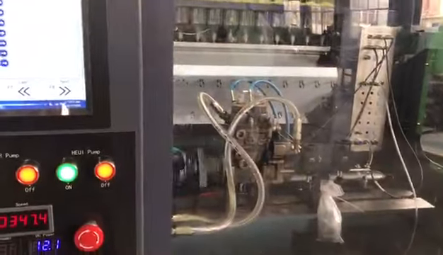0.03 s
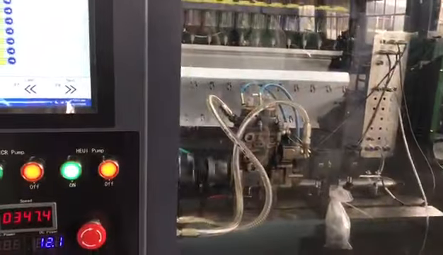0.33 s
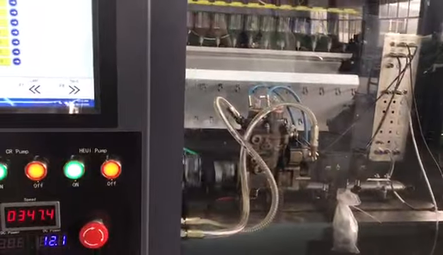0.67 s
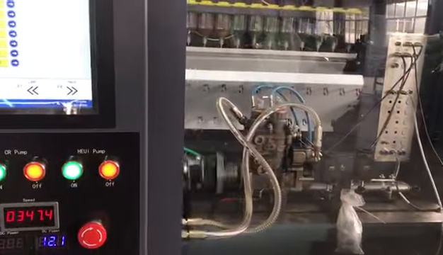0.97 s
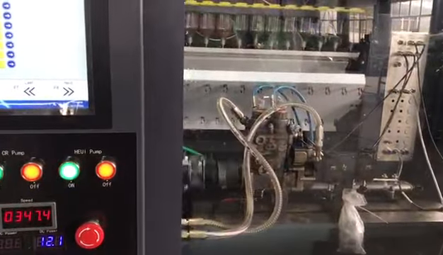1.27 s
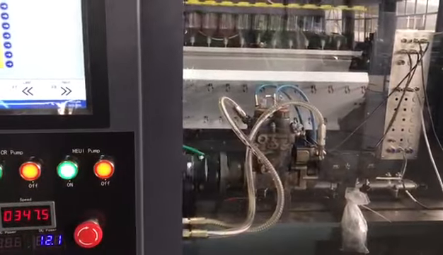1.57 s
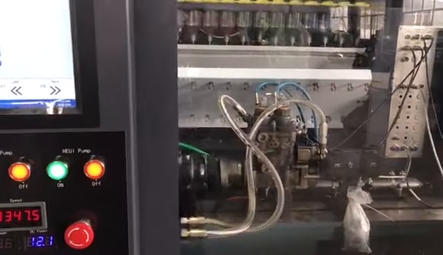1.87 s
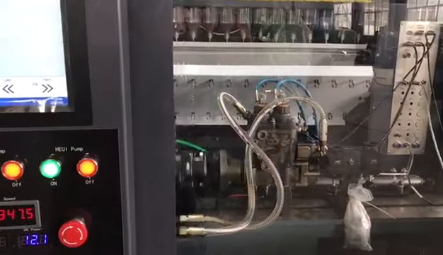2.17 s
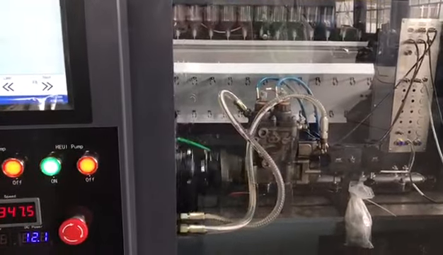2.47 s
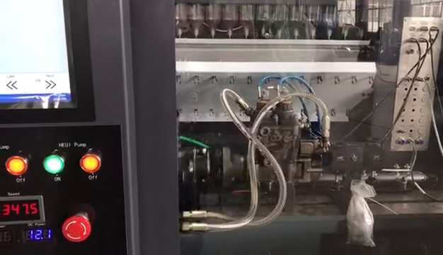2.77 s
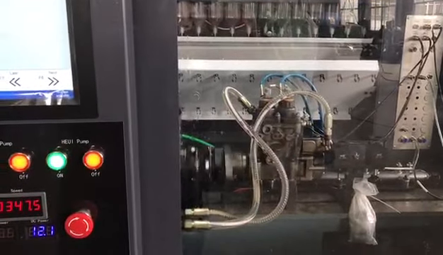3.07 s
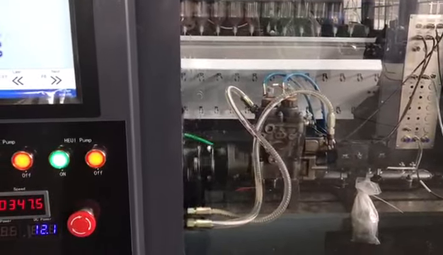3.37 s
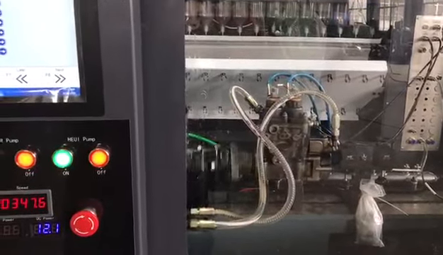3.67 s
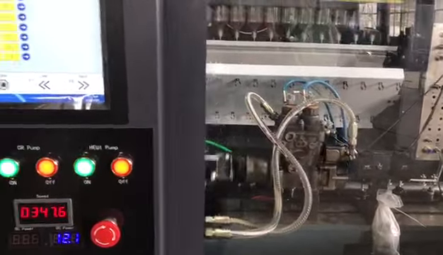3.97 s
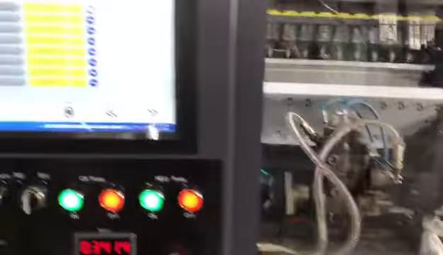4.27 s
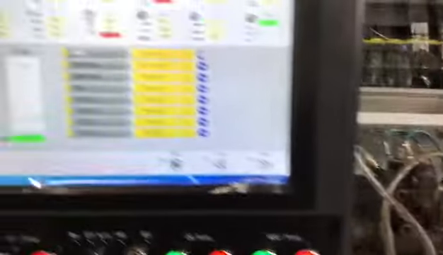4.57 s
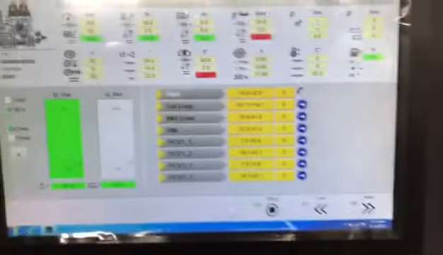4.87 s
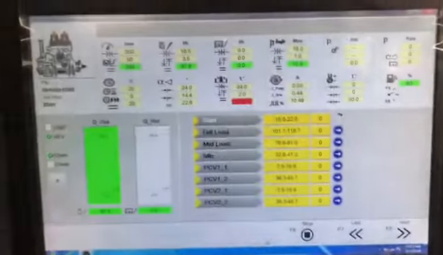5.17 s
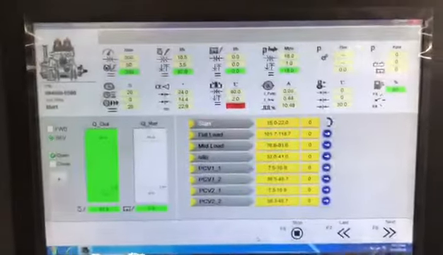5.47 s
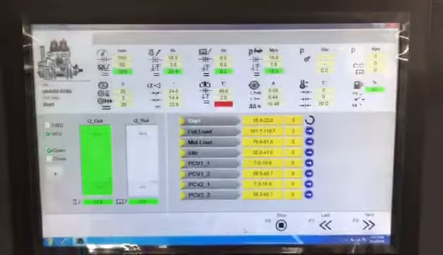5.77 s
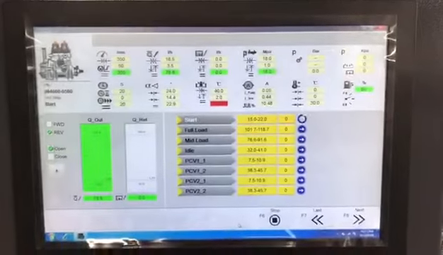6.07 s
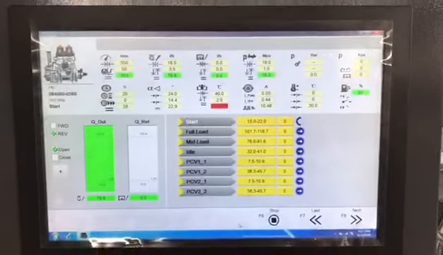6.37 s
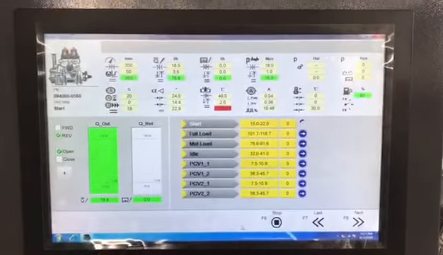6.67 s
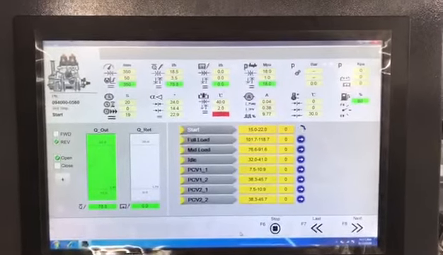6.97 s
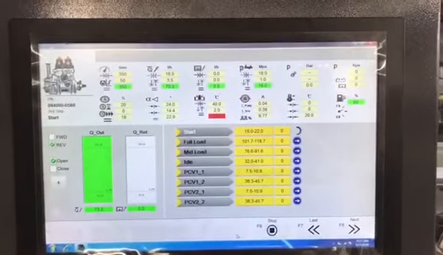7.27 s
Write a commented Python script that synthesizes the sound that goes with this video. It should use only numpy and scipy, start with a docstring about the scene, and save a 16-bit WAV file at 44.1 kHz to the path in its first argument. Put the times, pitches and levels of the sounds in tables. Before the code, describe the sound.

A piercing valve whine grows louder over the drone, gear noise and pulsing hiss of a fuel pump running in a workshop.

```python
"""A shrill valve whine over the drone of a high pressure fuel pump on a workshop test bench.
Pressure ripple shakes the valve's pitch and the room smears it into a band, much louder after 2 s.
The valve also squeals and spits. Plungers ring the housing, fuel hisses in pulses, and gears, fan,
motor and supply pump run at steady speed. From 3.4 s the listener turns to a booming control cabinet."""
import sys
import numpy as np
from scipy import signal
from scipy.fft import rfft, irfft, next_fast_len
from scipy.io import wavfile
from scipy.ndimage import uniform_filter1d

SR = 44100
rng = np.random.default_rng(int(sys.argv[2]) if len(sys.argv) > 2 else 0)


def output_pcm(signal):
    """Save a mono or channel-first signal as 16-bit PCM at the path in sys.argv[1].

    Samples are clipped to [-1, 1] before scaling.
    """
    pcm = np.clip(np.atleast_2d(signal).T, -1, 1) * 32767
    wavfile.write(sys.argv[1], SR, np.round(pcm).astype(np.int16))


N = 322371
TIME_S = np.arange(N) / SR

# main valve mode: (time [s], pitch [Hz], level [dB], swing scale [Hz])
WHINE = [(0.0, 5380, -34.5, 116), (0.5, 5400, -34, 117.6), (0.68, 5367, -32.5, 100),
         (0.88, 5320, -33, 84.9), (1.2, 5354, -35, 110.7), (1.5, 5300, -42, 104), (1.62, 5300, -40, 110),
         (1.99, 5240, -44.5, 115), (2.04, 5290, -37, 90.34), (2.11, 5290, -35.5, 90),
         (2.16, 5380, -29.5, 144), (2.27, 5400, -27, 145), (3.1, 5440, -26, 150.1),
         (3.34, 5430, -29.5, 153.7), (3.52, 5446, -25, 145), (4.25, 5453, -26, 159.2),
         (5.1, 5466, -26.5, 163.6), (6.0, 5498, -28, 163.5), (6.45, 5545, -30, 175),
         (7.05, 5535, -32, 169.2), (7.3, 5555, -33, 169)]
# brief dips and peaks in the whine's random flutter: (peak time [s], dip before it [s], depth [dB])
WHINE_FLICKER = [(3.057, 0.019, 4.5), (3.392, 0.033, 10), (3.622, 0.035, 6), (3.735, .018, 3)]
# other valve modes: (start [s], length [s], pitch [Hz], level [dB], fade [dB], swing [Hz])
SQUEALS = [(1.328, 0.7, 5470, -44, 2, 22.2), (1.71, 0.25, 5050, -36.5, 14, 44.7),
           (2.382, 0.54, 10440, -52, 3, 81), (2.66, 0.3, 5000, -43, 3, 30),
           (3.455, 2.6, 5313, -34.5, -2, 36.23), (2.303, 3.84, 5503, -36, 3, 40.4),
           (4.31, 3.76, 5850, -44, -3, 35.01), (5.67, 0.38, 10850, -47, 6, 130.2),
           (6.085, 0.15, 6020, -27.5, 13, 55), (6.246, 0.73, 6060, -40, 14, 41.7),
           (6.104, 1.2, 5700, -37.5, -0.5, 29.7), (6.606, 0.51, 10760, -39.5, 17, 131),
           (6.62, 0.57, 5380, -28.5, 4, 55.6)]
# short bright ticks: (time [s], level [dB])
# those at 3.057 s and 3.736 s lie on random peaks of the whine; the rest are valve spits
TICKS = [(.487, -30), (3.057, -30), (3.62, -30), (3.736, -29), (5.344, -27), (5.352, -33), (5.448, -29),
         (5.932, -31), (6.287, -33), (6.353, -32)]
# fuel sprays as the valve opens or a mode catches: (start [s], rise [s], decay [s], boost scale [dB])
SPRAYS = [(2.18, 0.044, 1.5, 6), (6.09, .02, 0.048, 9), (6.33, 0.02, 0.1, 5)]
# housing tone: (time [s], pitch [Hz], level [dB])
HOUSING_TONE = [(0, 1834, -41.5), (1.2, 1838, -41), (2.5, 1826, -42.5), (5.0, 1829, -44), (5.7, 1840, -41),
                (7.3, 1856, -41.5)]
# resonances: (centre [Hz], width [Hz], relative gain [dB])
HOUSING_MODES = [(1814, 140, 0), (3160, 86, -22)]
FITTING_MODES = [(3106, 45, -4), (3194, 105, 2)]
PIPE_MODES = [(11040, 200, -1.5), (11170, 210, 1), (11500, 200, -15)]
CABINET_MODES = [(178.3, 17.1, 7.5), (272, 13, 0), (369, 14, 0.5), (818, 25, 7.5)]
# noise spectra: (frequency [Hz], relative density [dB])
TICK_SPECTRUM = [(2500, -31), (4800, -6), (5600, 9), (6500, -3.5), (8000, -12), (11300, -7), (12400, -29)]
HISS_SPECTRUM = [(1500, -35), (3500, 8), (5000, 5), (6100, 12.5), (6700, 8.5), (7600, 4), (8600, 5),
                 (9400, 3), (10200, 1), (11800, -13), (12400, -40)]
GEAR_SPECTRUM = [(250, -33), (470, -16.5), (530, -12), (670, -3.5), (790, -5.5), (1000, -0.5), (1350, 0.5),
                 (1600, -0.5), (2050, -1.5), (2300, -2), (2750, -10), (4000, -40)]
METAL_SPECTRUM = [(1500, -26), (2500, -6), (3300, 2), (3800, 2.5), (4700, 0.5), (6000, -8), (7500, -69),
                  (12000, -16.5)]
FRAME_SPECTRUM = [(20, -22), (33, -14), (50, -8), (90, -7.5), (130, -0.5), (175, -3.5), (240, -1),
                  (350, -4), (430, -10.5), (700, -22), (1500, -70)]
FAN_SPECTRUM = [(300, -23), (420, -8.5), (540, -2), (690, 1.5), (800, -10.5), (1200, -30)]
RUB_SPECTRUM = [(20, -22), (45, -9), (75, -4), (120, -7), (300, -40)]
# noise envelopes: (time [s], level [dB])
GEAR_LEVEL = [(0, -36.5), (2.1, -35), (2.5, -36.6), (3.5, -37), (4.4, -37.5), (5.3, -38.5), (7.3, -38)]
FRAME_LEVEL = [(0, -49.5), (2.1, -45.5), (2.5, -50.5), (3.7, -49), (4.4, -48.5), (6.0, -47), (7.3, -47.5)]
CABINET_LEVEL = [(0, -64), (3.4, -63), (4.2, -47.5), (5.2, -47.5), (6.0, -50), (7.3, -54.5)]
# hum of bench motor, supply pump, drive and pump body: (pitch [Hz], level [dB])
MOTOR_TONES = [(247, -66), (296, -61), (543, -64.5), (819, -61), (891, -57)]
SUPPLY_TONES = [(65.1, -60), (130.1, -64), (195.2, -57.5), (325.3, -61.5)]
DRIVE_TONES = [(43.2, -72), (189.1, -63.5), (224.1, -63.5), (275.2, -65), (347.8, -62.5), (1772, -51),
               (1928, -56), (1966, -59)]
# hum tones that form standing waves: (pitch [Hz])
STANDING_HZ = [139, 172.3, 260.3, 445.6, 493.9, 987.3, 1234.6, 1338]
# their levels, row for row: (initial level [dB], change as the listener moves [dB], change time [s])
STANDING_LEVELS = [(-53.5, -6.5, 2.16), (-56, 3, 3.67), (-55.5, 3.5, 4.77), (-56, -10, 2.4),
                   (-62.5, 3, 1.6), (-52, -3.5, 1.64), (-46.5, -5, 1.7), (-56.5, 2.5, 3.3)]
# hand rubs: (centre time [s], half length [s], peak level [dB])
RUBS = [(1.9, 0.5, -58), (4.446, 0.37, -50.5), (6.1, .4, -56)]
# workshop reverberation: (frequency [Hz], T60 [s])
WORKSHOP_T60 = [(200, 0.15), (5000, 0.38), (12000, 0.13)]

PUMP_HZ, FIRST_STROKE_S, GEAR_BEAT_HZ = 5.79, 0.022, 12.35
PULSE_DB_PER_LOAD = 1.2
USUAL_WHINE_DB = -30
TURN_START_S, TURN_LENGTH_S = 3.4, 1.0
BAND_LIMIT_HZ = 12300


def valve_whine(wander_hz=11.97, shake_hz=39.4, chatter_db=0.46):
    """The valve sings in the fuel flow and chatters on its seat; pressure ripple shakes its pitch."""
    pitch_hz, level_db, swing_hz = curves(WHINE)
    ripple = unit(np.tanh(wobble(220)))  # the seat limits the swing
    spikes = np.clip(wobble(260), 0, 1.7) ** 2  # pressure spikes fling the pitch up
    pressure = 0.8 * ripple + 0.273 * (spikes - spikes.mean())
    hz = pitch_hz + wander_hz * wobble(14) + swing_hz * pressure + shake_hz * wobble(900)
    upper_mode = amp(-25) * tone(2 * hz + 160 + 90 * wobble(500))
    whine = room(tone(hz) + upper_mode, direct_db=-10)
    whine *= amp(chatter_db * wobble(230))
    return amp(level_db + flicker_db() + 0.76 * wobble(13)) * steadied(whine)


def flicker_db(peak_decay_s=0.015):
    """Brief dips and peaks in the whine's random flutter."""
    out = np.zeros(N)
    for peak_s, dip_s, depth_db in WHINE_FLICKER:
        knots_s = peak_s + np.array([-dip_s, -dip_s / 2, -0.001, 0.001, peak_decay_s])
        out += depth_db * np.interp(TIME_S, knots_s, [0, -1, -1, 1, 0])
    return out


def valve_squeals(edge_s=0.0066):
    """Other valve modes catch abruptly, fade or swell, and drop out."""
    out = np.zeros(N)
    for start_s, length_s, hz, db, fade_db, swing_hz in SQUEALS:
        age_s = TIME_S - start_s
        progress = np.clip(age_s / length_s, 0, 1)
        gate = np.clip(np.minimum(age_s, length_s - age_s) / edge_s, 0, 1)
        out += gate * amp(db - fade_db * progress) * tone(hz + swing_hz * wobble(200))
    return room(out, direct_db=-4)


def ticks(faint_per_s=40, decay_s=0.0033):
    """Sharp and faint spits of the valve on its seat, plus bright ticks on two random whine peaks."""
    position, softness = rng.random((int(faint_per_s * N / SR), 2)).T
    onsets = (position * N).astype(int)
    faint_db = -37 + 0.41 * flow_db()[onsets] - 4 * softness
    faint = np.bincount(onsets, amp(faint_db), N)
    sharp_s, sharp_db = np.transpose(TICKS)
    sharp = np.bincount((sharp_s * SR).astype(int), amp(sharp_db), N)
    envelope = signal.lfilter([1], [1, -np.exp(-1 / (decay_s * SR))], faint + sharp)
    return room(envelope * noise(TICK_SPECTRUM), direct_db=-5, positions=4)


def gears():
    """Gear noise under a sawtooth load: sudden rise, steady release."""
    load = -signal.sawtooth(2 * np.pi * GEAR_BEAT_HZ * TIME_S)
    return amp(curves(GEAR_LEVEL)[0] + 0.5 * load + wobble(150)) * noise(GEAR_SPECTRUM)


def plunger_rattle():
    """One rattle from the plungers rings both housing and fittings."""
    rattle = amp(0.4 * pump_load() + 2.6 * wobble(30)) * rng.standard_normal(N)
    housing = amp(-38.5 - 0.5 * turned()) * ring(rattle, HOUSING_MODES)
    fittings = amp(-52.5 - 2 * turned()) * ring(rattle, FITTING_MODES)
    return housing + fittings


def housing_tone(waver_hz=10.05, shake_hz=12.5):
    """The pump housing rings on one wavering pitch."""
    pitch_hz, level_db = curves(HOUSING_TONE)
    hz = pitch_hz + waver_hz * wobble(13) + shake_hz * wobble(90)
    return amp(level_db + 1.15 * wobble(12)) * steadied(room(tone(hz), direct_db=2.5, positions=6))


def metal_rustle():
    """Rubbing metal rustles with the pump load."""
    level_db = -41.5 - 3 * turned() + 0.29 * pump_load() + 1.4 * wobble(120)
    return amp(level_db) * noise(METAL_SPECTRUM)


def fuel_hiss():
    """The fuel jet follows the flow, pulses with the load and flares at each spray."""
    level_db = -47 - 3 * turned() + 0.14 * flow_db() + PULSE_DB_PER_LOAD * pump_load()
    for start_s, rise_s, decay_s, boost_db in SPRAYS:
        age_s = np.maximum(TIME_S - start_s, 0)
        level_db += boost_db * np.minimum(age_s / rise_s, 1) * np.exp(-age_s / decay_s)
    flutter_db = 1.3 * wobble(32) + 1.2 * wobble(300)
    return amp(level_db + flutter_db) * noise(HISS_SPECTRUM)


def drone(sway_s=0.18):
    """Rotating parts hum; the strongest tones shift in level as the listener crosses standing waves."""
    out = np.zeros(N)
    for machine in (MOTOR_TONES, SUPPLY_TONES, DRIVE_TONES):
        speed = 1 + 0.001125 * wobble(3)
        for hz, db in machine:
            out += amp(db + 2.5 * wobble(3.7)) * tone(hz * speed)
    speed = 1 + 0.00058 * wobble(3.03)
    for hz, (db, change_db, change_s) in zip(STANDING_HZ, STANDING_LEVELS):
        moved = (1 + np.tanh((TIME_S - change_s) / sway_s)) / 2
        out += amp(db + change_db * moved + 1.44 * wobble(6)) * tone(hz * speed)
    return out


def frame_rumble():
    """The bench frame rumbles unevenly."""
    return amp(curves(FRAME_LEVEL)[0] + 1.7 * wobble(9.7)) * noise(FRAME_SPECTRUM)


def cabinet_boom():
    """Shaken cabinet panels boom, louder with the listener close."""
    return amp(curves(CABINET_LEVEL)[0]) * ring(rng.standard_normal(N), CABINET_MODES)


def fan():
    """Fan rush, weaker as the listener turns away."""
    return amp(-50.5 - 7.5 * turned() + 0.8 * wobble(12)) * noise(FAN_SPECTRUM)


def pipes():
    """Pulsing flow keeps the steel fuel lines ringing faintly."""
    level_db = -57 + 0.3 * flow_db() + PULSE_DB_PER_LOAD * pump_load() + wobble(14)
    return amp(level_db) * ring(rng.standard_normal(N), PIPE_MODES)


def hand_rubs():
    """Low rubs of a hand as the listener sways and turns."""
    envelope = sum(amp(db) * np.exp(-((TIME_S - at_s) / half_s) ** 2) for at_s, half_s, db in RUBS)
    return envelope * amp(2.8 * wobble(7.5)) * noise(RUB_SPECTRUM)


def pump_load():
    """Load from shaft and plunger strokes: 1, 3 and 12 pulses per turn."""
    shaft_rad = 2 * np.pi * PUMP_HZ * (TIME_S - FIRST_STROKE_S)
    return np.cos(shaft_rad) + np.cos(3 * shaft_rad) + 0.39 * np.cos(12 * shaft_rad)


def flow_db():
    """Whine level above its usual value; stands for the fuel flow."""
    return curves(WHINE)[1] - USUAL_WHINE_DB


def turned():
    """Listener's smooth turn: 0 facing the pump, 1 at the cabinet."""
    progress = np.clip((TIME_S - TURN_START_S) / TURN_LENGTH_S, 0, 1)
    return np.sin(np.pi / 2 * progress) ** 2


def room(x, direct_db, positions=14):
    """Direct sound plus workshop tail at equal overall power; echoes shift as the listener sways."""
    out = np.zeros(N + SR)
    place = np.linspace(0, positions - 1, N)
    for k in range(positions):
        hz, age_s, bands = signal.stft(rng.standard_normal(SR // 2), SR, nperseg=256)
        decay = amp(-60 * age_s / along(WORKSHOP_T60, hz)[:, None])
        impulse = signal.istft(bands * decay, SR, nperseg=256)[1]
        impulse[0] += amp(direct_db) * np.linalg.norm(impulse)
        response = rfft(impulse)
        band_power = uniform_filter1d(np.abs(response) ** 2, 25)
        impulse = irfft(response / np.sqrt(band_power))  # a diffuse room favours no band
        near = np.flatnonzero(np.abs(place - k) < 1)
        crossfade = np.cos(np.pi / 2 * (place[near] - k))
        heard = signal.fftconvolve(x[near] * crossfade, impulse)
        out[near[0]:][:len(heard)] += heard
    return out[:N]


def ring(x, modes):
    """x through resonances of alternating sign, at rms 1."""
    def response(hz):
        return sum((-1) ** k * amp(db) * 1j * hz * width / (centre ** 2 - hz ** 2 + 1j * hz * width)
                   for k, (centre, width, db) in enumerate(modes))
    return unit(filtered(x, response))


def steadied(x, window_s=0.08):
    """Hold the slow level at rms 1; keep the fast flutter."""
    size = int(window_s * SR)
    power = uniform_filter1d(uniform_filter1d(x ** 2, size), size)
    return x / np.sqrt(np.abs(power) + 1e-12)


def tone(hz):
    """Sine of rms 1 on a pitch curve."""
    return np.sqrt(2) * np.sin(2 * np.pi * (np.cumsum(hz) / SR + rng.random()))


def noise(spectrum):
    """Shaped noise of rms 1."""
    return unit(filtered(rng.standard_normal(N), lambda hz: amp(along(spectrum, hz))))


def wobble(knots_per_s):
    """Smooth random curve of rms 1."""
    knots = rng.standard_normal(int(N * knots_per_s / SR) + 4)
    fine = signal.resample(knots, len(knots) * 16)
    return unit(np.interp(TIME_S * knots_per_s, np.arange(len(fine)) / 16, fine))


def filtered(x, response):
    """x through a complex frequency response."""
    size = next_fast_len(N + SR // 2)
    return irfft(rfft(x, size) * response(np.fft.rfftfreq(size, 1 / SR)), size)[:N]


def curves(rows):
    """One value per sample for each column after the time."""
    times_s, *columns = np.transpose(rows)
    return [np.interp(TIME_S, times_s, column) for column in columns]


def along(points, hz):
    """Read (frequency [Hz], value) points on a log axis."""
    knots_hz, values = np.transpose(points)
    return np.interp(np.log(hz + 1), np.log(knots_hz + 1), values)


def amp(db):
    """Decibels to gain."""
    return 10 ** (np.asarray(db) / 20)


def unit(x):
    """Scale to rms 1."""
    return x / np.sqrt(np.mean(x ** 2) + 1e-20)


def scene():
    """The whole bench from the control panel, mono."""
    valve = valve_whine() + valve_squeals() + ticks()
    pump = gears() + plunger_rattle() + housing_tone() + metal_rustle() + fuel_hiss()
    background = drone() + frame_rumble() + cabinet_boom() + fan() + pipes() + hand_rubs()
    return (valve + pump + background)[None]


def record(dry):
    """Cut everything above the band limit."""
    return np.array([filtered(x, lambda hz: hz < BAND_LIMIT_HZ) for x in dry])


dry = scene()
out = record(dry)
output_pcm(out)
```